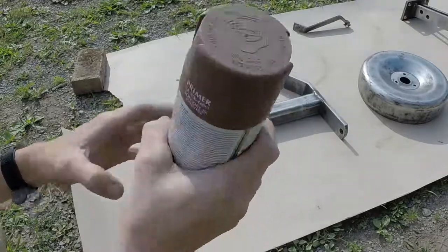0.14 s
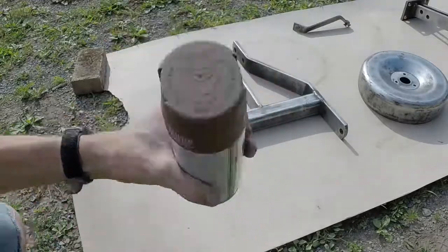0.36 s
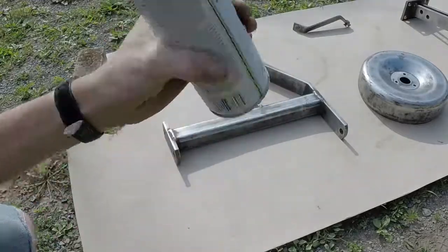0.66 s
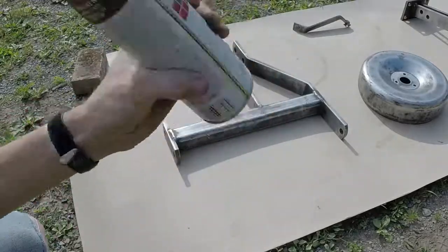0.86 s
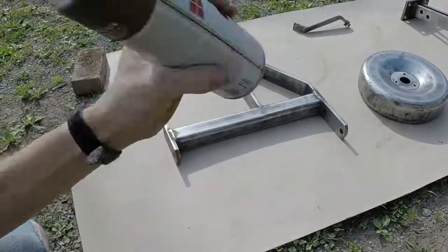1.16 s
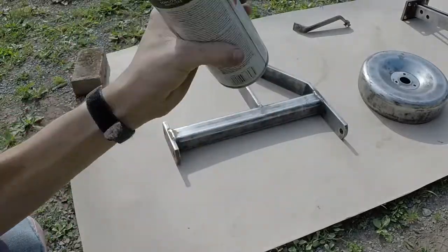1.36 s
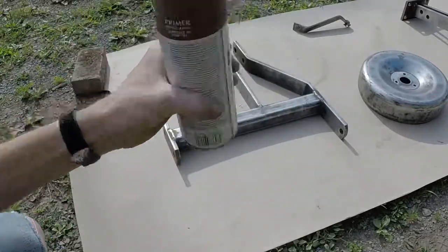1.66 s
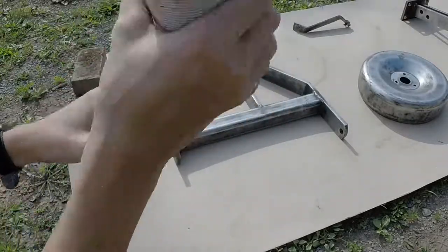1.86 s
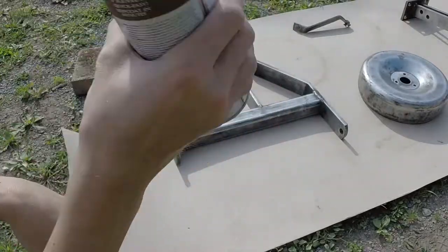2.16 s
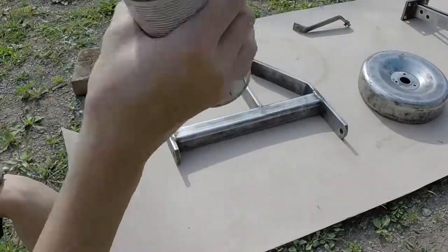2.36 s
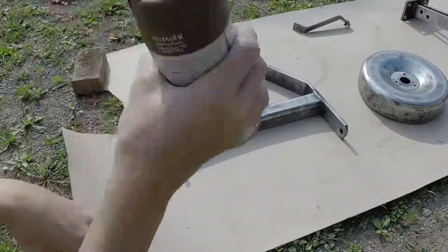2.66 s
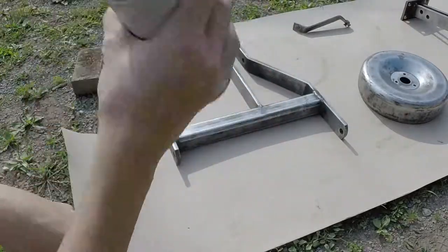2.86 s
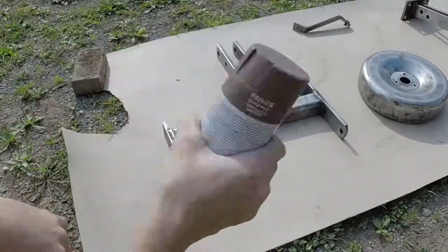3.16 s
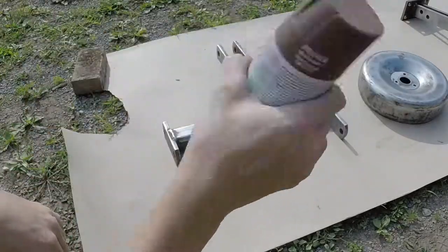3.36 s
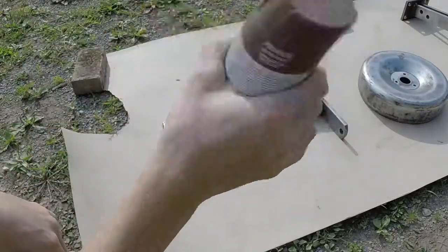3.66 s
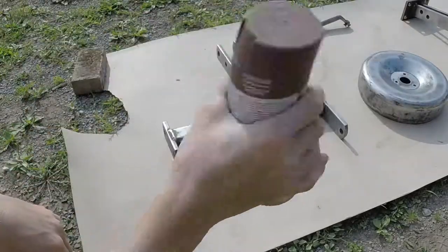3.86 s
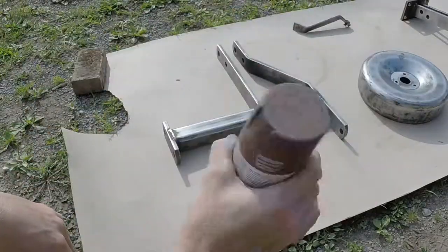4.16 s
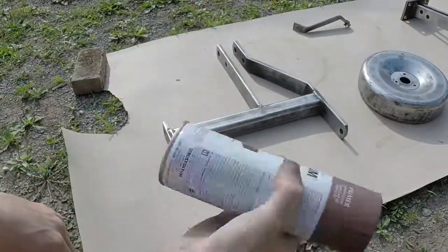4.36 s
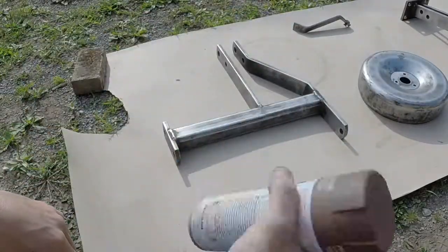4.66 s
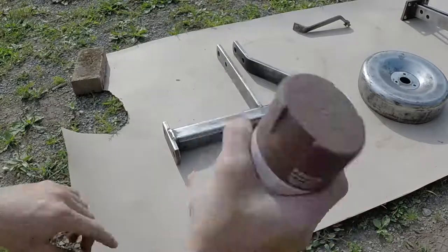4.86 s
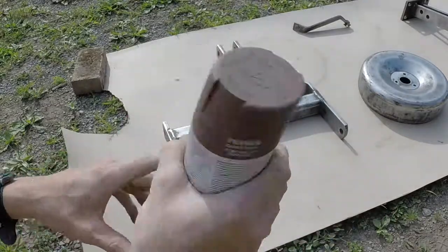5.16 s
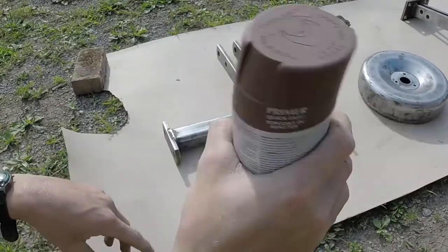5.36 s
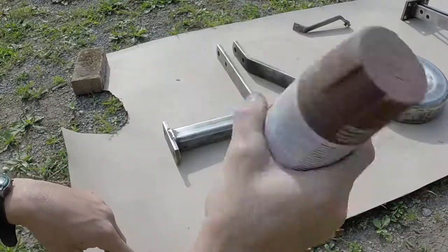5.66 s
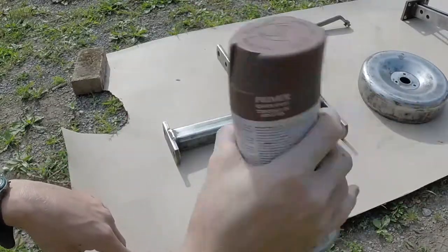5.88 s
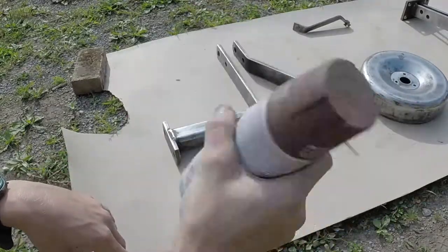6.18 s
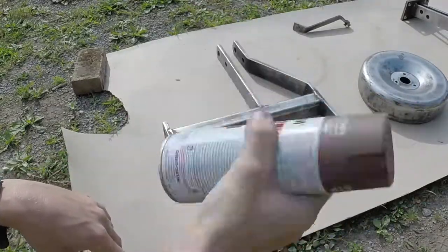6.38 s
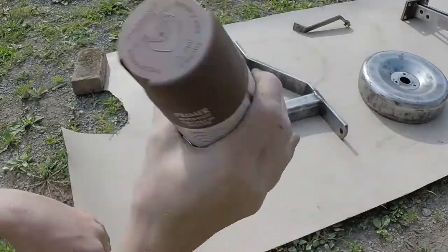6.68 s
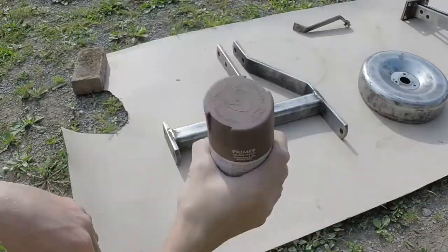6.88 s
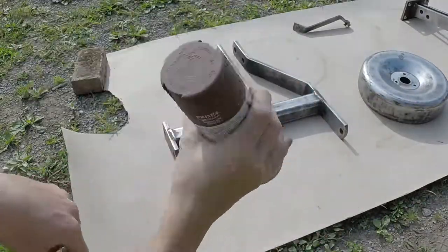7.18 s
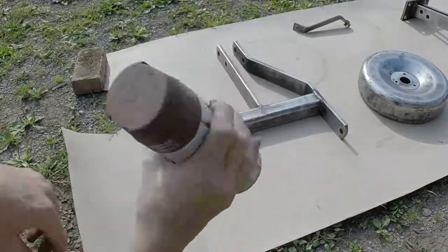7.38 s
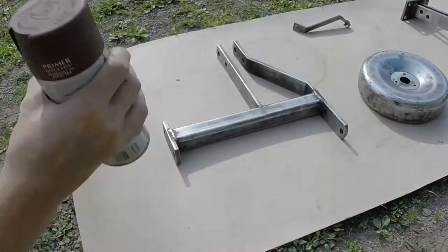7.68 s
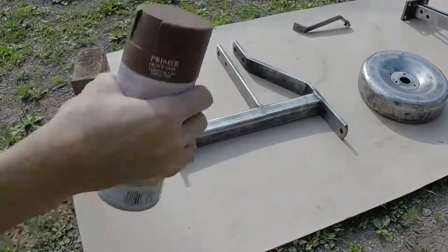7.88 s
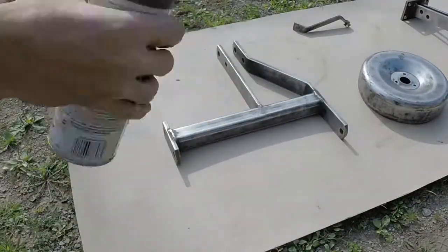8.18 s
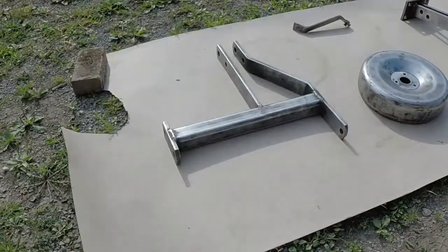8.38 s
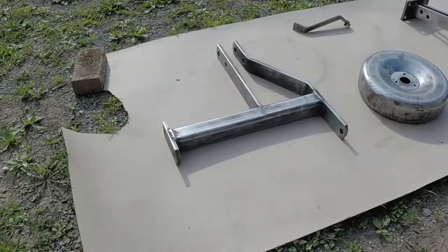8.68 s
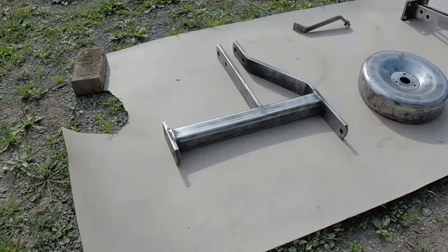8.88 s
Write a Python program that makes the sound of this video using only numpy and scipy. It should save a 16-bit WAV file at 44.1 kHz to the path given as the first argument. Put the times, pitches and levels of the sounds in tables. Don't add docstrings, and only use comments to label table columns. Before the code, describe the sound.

Outdoors, dry and close, a steel spray can is shaken and its mixing ball raps inside. A quick cluster of bright knocks opens the sound, then only faint touches until about 0.7 s, when rapid clacks run to 1.7 s. A distant machine's thin nasal buzz rises around 0.5 to 0.9 s, and its low hum swells several times up to 3.2 s. From 2.1 s stronger strokes ring the can's end, loudest near 2.7 s; from 3.3 to 4.1 s the rattle is dense and clattering. Between 4.2 and 6.6 s it swirls and rocks sideways, softer and duller, thinning around 5.1 s as the buzz briefly returns. Bright, hard up-and-down knocks resume from 6.6 to 8.5 s, the buzz showing again near 7.2 s. A few faint touches fade into soft air and distant traffic, with one small tick at 9 s.

```python
import sys
import numpy as np
from scipy import signal
from scipy.fft import rfft, irfft, next_fast_len
from scipy.io import wavfile
from scipy.ndimage import uniform_filter1d

SR = 44100
rng = np.random.default_rng(int(sys.argv[2]) if len(sys.argv) > 2 else 0)


def store_pcm(level_fs):
    pcm = np.round(np.clip(level_fs, -1, 1) * 32767).astype(np.int16)
    wavfile.write(sys.argv[1], SR, np.atleast_2d(pcm).T)


def nominal_scale(level):
    x = np.asarray(level, float) / 20
    return 10 ** x


N = 398531


def curve(table):
    s, *columns = np.transpose(table)
    return [np.interp(np.arange(N) / SR, s, column) for column in columns]


def level(x, db):
    return x * nominal_scale(db) / np.sqrt(np.mean(x ** 2))


def fade(pieces):
    return np.cos(np.pi * np.clip(pieces, -.5, .5)) ** 2


def held_noise(rows, hold):
    steps = np.repeat(rng.standard_normal((rows, N // hold + 1)), hold, axis=1)
    return uniform_filter1d(steps, hold, axis=1)[:, :N]


# frequency in Hz, density in dB per Hz.
AIR = [(25, -4.5), (60, 0.5), (290, -5.5), (600, -10), (1380, -14.5), (2200, -16.5), (5000, -25),
       (9000, -35.5), (13000, -43), (14300, -48), (15000, -60), (15800, -68)]


def garden():
    size = next_fast_len(N)
    hz = np.maximum(np.arange(size // 2 + 1) * SR / size, 1)
    air_hz, air_db = np.transpose(AIR)
    colour = nominal_scale(np.interp(np.log(hz), np.log(air_hz), air_db))
    air = irfft(rfft(rng.standard_normal(size)) * colour, size)[:N]
    stir_s, stir_db = .06, 1.53
    stir = held_noise(1, int(stir_s * SR))[0]
    return level(air * nominal_scale(stir_db * stir), -53.5)


# time in seconds, centre in Hz, level in dB.
BUZZ = [(0, 1690, -64), (.2, 1640, -59), (.4, 1660, -61.5), (.52, 1620, -56), (.68, 1585, -54),
        (.8, 1557, -53.5), (.86, 1600, -52), (1.0, 1700, -64), (1.7, 1650, -66), (1.95, 1550, -61),
        (2.4, 1660, -65), (5.0, 1670, -67), (5.17, 1630, -58.5), (5.3, 1620, -55), (5.4, 1560, -58),
        (5.6, 1450, -68), (6.9, 1570, -67), (7.2, 1555, -55.5), (7.6, 1600, -78)]
# time in seconds, peak level in dB.
HUM = [
    (.9, -50),
    (1.51, -53.5),
    (2.07, -60),
    (2.46, -50),
    (2.75, -47.5),
    (3.15, -54.5),
    (5.47, -59),
    (7.36, -60),
]


def machine():
    t = np.arange(N) / SR
    mains_hz, resonance_hz, swell_s = 50.65, 75, 0.34
    centre_hz, buzz_db = curve(BUZZ)
    line_hz = mains_hz * np.arange(27, 37)[:, None]
    waver_turns, waver_s = .15, .04
    waver = held_noise(len(line_hz), int(waver_s * SR))
    turns = line_hz * t + rng.random((len(line_hz), 1)) + waver_turns * waver
    resonance = 1 / (1 + ((line_hz - centre_hz) / resonance_hz) ** 2)
    buzz = np.sum(np.sin(2 * np.pi * turns) * resonance, axis=0)
    for power, db in [(2, -10), (3, -19)]:
        band = signal.butter(3, [power * 1300, power * 1950], "bandpass", fs=SR, output="sos")
        envelope = np.abs(signal.hilbert(buzz, next_fast_len(N))[:N])
        overtone = signal.sosfilt(band, (buzz / envelope) ** power)
        buzz = buzz + level(overtone, db)
    flicker_db = 2.5
    buzz = buzz * nominal_scale(flicker_db * waver[0])
    hum = nominal_scale(-68.5) + sum(nominal_scale(db) * fade((t - s) / swell_s) for s, db in HUM)
    return nominal_scale(buzz_db) * buzz + hum * np.sin(4 * np.pi * mains_hz * t)


# time in seconds, cap turned to the microphone in dB, paint slosh in dB.
MOTION = [(0, -3, -4), (.25, 7, -6), (.65, -3, 3), (.9, 6, -2.5), (1.4, 5, 0.5), (1.8, 3, 3), (2.4, 0, 3),
          (3.0, 7, 2.5), (3.3, 4, 4), (4.0, -1, -1), (4.3, 8, 4.5), (4.9, 1, 2.5), (5.2, -1, 1.5),
          (5.9, 2, 4.5), (6.4, 2.5, 3), (7.6, 8, 1.5), (8.4, 1.5, 5.5), (8.8, 1, -15), (9.0, 3, -12)]


def rolling():
    roll_hz, width_hz = 2390, 340
    roll = signal.lfilter(*signal.iirpeak(roll_hz, roll_hz / width_hz, SR), rng.standard_normal(N))
    return level(roll, -62.5) * nominal_scale(curve(MOTION)[1])


# middle in seconds, then levels of wall, bottom, rim and cap modes in dB.
FIRST_UP_DOWN = [(0.015, -35.5, -34, -34.5, -48.5), (0.044, -41.5, -40, -47, -58),
                 (0.082, -37.5, -55, -51, -67), (0.125, -31, -33, -34, -49),
                 (0.734, -37.5, -38.5, -48, -63.0), (0.784, -41.5, -52, -54, -57.5),
                 (0.841, -39.5, -38.5, -43.0, -58), (0.94, -35.0, -35.5, -41, -54.5),
                 (0.987, -47, -52, -45.5, -55.5), (1.033, -30.5, -32.5, -31, -45.5),
                 (1.076, -42, -44, -46, -56), (1.135, -29, -37.5, -35.5, -49.0),
                 (1.173, -43.5, -50, -49, -55), (1.218, -38.5, -38.5, -31.5, -44.5),
                 (1.271, -39.5, -47.0, -56, -57.0), (1.314, -39, -33.5, -42.5, -58.5),
                 (1.356, -45.5, -52, -45.0, -55), (1.398, -30, -27, -39.5, -51),
                 (1.629, -44.5, -49, -62.0, -59.5), (1.679, -41, -42, -43.5, -50)]
SECOND_UP_DOWN = [(2.087, -37, -43.0, -45.0, -51.5), (2.129, -37.5, -43, -48.5, -59),
                  (2.176, -34.5, -29, -43, -59), (2.22, -44.0, -50, -54, -58), (2.478, -45, -42, -54, -67),
                  (2.504, -48, -33.0, -45.5, -51), (2.533, -43.5, -47.5, -52.0, -53),
                  (2.596, -40, -33, -46, -51), (2.636, -37.5, -43, -47.0, -52.5),
                  (2.675, -52, -22, -26, -46.5), (2.74, -44.0, -51, -52.0, -61.0),
                  (2.782, -30.5, -23, -36.5, -48), (2.849, -43.5, -58, -52, -55.5),
                  (2.914, -36.5, -33, -43, -59), (3.027, -33.5, -24.5, -39.5, -52),
                  (3.166, -30, -36.5, -45, -51.5)]
TIPPED_OVER = [(3.277, -42.5, -44.5, -49, -64), (3.305, -43, -39, -47.5, -56),
               (3.352, -38, -34.5, -40.5, -54), (3.375, -41, -36, -36.5, -51.5),
               (3.422, -43, -36.5, -57.0, -63), (3.448, -40, -38, -41, -59.0), (3.475, -41, -32, -46, -55),
               (3.515, -37, -32, -41, -48.5), (3.552, -33.5, -32, -40.5, -54),
               (3.621, -35.5, -32.5, -47, -52.5), (3.641, -43, -28.5, -35, -50),
               (3.663, -28.5, -32.5, -38, -49), (3.711, -40, -34, -37.5, -57),
               (3.734, -38, -34.5, -53, -53.5), (3.767, -34.5, -39, -45.5, -57),
               (3.812, -33.5, -32, -35, -51), (3.862, -41.5, -34, -37.5, -52.5),
               (3.899, -39.0, -33.5, -40.5, -59), (3.961, -41.5, -32.5, -43.5, -60),
               (4.042, -42.5, -38, -43.5, -57.0), (4.112, -40.5, -36.5, -39.5, -52),
               (4.141, -42, -42.5, -54, -64)]
SWIRLED = [(4.214, -37, -46, -49.5, -61), (4.265, -46, -52, -53, -63.0), (4.323, -39.5, -53, -54, -54.5),
           (4.37, -42.5, -48, -53, -54.5), (4.418, -45, -51.5, -68, -62.5), (4.436, -35, -55, -58, -57),
           (4.498, -41, -45.0, -46.5, -54.5), (4.55, -39, -50.0, -51, -60), (4.656, -37.0, -56, -54, -61),
           (4.759, -35.5, -48, -53.5, -56), (4.806, -43, -50.5, -62.5, -63), (4.863, -39.5, -55, -59, -62),
           (5.013, -43.5, -50.0, -53, -62), (5.274, -44, -46, -47.5, -58.5)]
SIDEWAYS = [(5.469, -41, -51, -60, -63), (5.506, -40, -52.5, -72, -65), (5.573, -39.5, -47, -55.5, -67),
            (5.602, -44, -44, -66, -62), (5.65, -39, -47.0, -58, -60), (5.721, -39, -56, -45.5, -51.5),
            (5.852, -36.5, -51, -57, -61.5), (5.868, -43, -53, -48, -56), (5.917, -42, -47.0, -61.0, -66.5),
            (5.988, -43.5, -53.0, -48.0, -56.5), (6.013, -45, -54, -65, -65.0),
            (6.032, -53, -52, -49.0, -55), (6.059, -37.5, -43, -59, -54), (6.097, -36, -48.5, -52.0, -61),
            (6.133, -38.5, -51.5, -50.0, -53), (6.161, -43.5, -48, -56.5, -63),
            (6.185, -42, -52, -50.0, -56), (6.212, -44, -50, -52, -57), (6.238, -36.5, -52.5, -50.0, -59.0),
            (6.294, -39.5, -44, -54, -60), (6.355, -41.5, -58, -52, -61), (6.452, -42, -53, -54.0, -60.5),
            (6.512, -44.5, -58, -50.5, -64)]
LAST_UP_DOWN = [(6.638, -33.5, -33.5, -32.5, -44), (6.682, -40.5, -51, -50, -57),
                (6.74, -39, -28, -33.5, -40.5), (6.786, -44.5, -57, -47, -55.0),
                (6.857, -46.5, -47, -54, -50.0), (6.896, -46, -60.0, -46, -61),
                (6.945, -42.5, -39.5, -41.0, -51), (7.034, -39, -29.0, -40.5, -44),
                (7.152, -39, -37, -42.0, -45.5), (7.198, -48, -55, -47.5, -57),
                (7.246, -38.5, -35.5, -44, -56.0), (7.35, -36, -31.5, -36.5, -43.5),
                (7.397, -44, -52, -52, -55), (7.446, -35.5, -31, -40.5, -49), (7.511, -43, -52, -51, -57),
                (7.551, -34.5, -26, -29, -42.5), (7.781, -40.5, -36.0, -41.5, -53.5),
                (7.832, -41, -52, -57, -57), (7.896, -42, -26.5, -36.5, -49),
                (8.012, -35.5, -34, -43.0, -50), (8.104, -37.5, -26, -39, -49),
                (8.213, -31, -28.5, -33.5, -46), (8.258, -42.5, -47, -50.5, -61),
                (8.349, -61, -39, -52.5, -65.0), (8.391, -41.5, -44, -59.5, -61),
                (8.41, -50, -44, -51, -58), (8.434, -37.5, -35.5, -39.5, -54),
                (8.47, -53, -45.5, -54, -58.5), (8.532, -42.5, -47.5, -47, -65),
                (9.027, -45, -45.5, -49.5, -51)]
# middle in seconds, then levels of wall, bottom and rim modes in dB.
REBOUNDS = [(0.202, -50.5, -58, -72), (0.307, -50, -55, -61), (0.454, -46, -54, -53.5),
            (0.61, -53, -68, -74), (0.663, -50, -55, -55.5), (0.703, -54, -59.0, -62.5),
            (0.885, -44.5, -52, -51), (0.922, -45, -47, -57), (0.962, -43.5, -59.0, -63),
            (1.379, -44.5, -54, -71), (1.458, -52, -56.0, -68), (1.517, -47, -51, -57.5),
            (1.591, -50, -50.5, -50.5), (1.648, -42.5, -47, -62), (1.748, -53, -57, -61),
            (1.841, -54, -60, -74), (1.88, -55, -55.5, -68), (1.95, -52.5, -57, -78),
            (2.043, -50.5, -52.0, -63.5), (2.105, -46, -47, -58), (2.266, -45.5, -56.5, -59),
            (2.332, -62, -63, -59), (2.386, -53, -63, -61), (2.442, -53.0, -51, -61),
            (2.564, -53.0, -52, -62), (2.69, -43, -39, -46), (2.77, -57, -55, -60),
            (2.722, -51, -61.0, -70), (2.826, -48, -56, -71), (2.893, -53, -54.0, -76),
                   (2.95, -52, -50, -61), (2.977, -49, -57, -53), (3.048, -43, -49, -53.0),
                   (3.092, -47, -59, -52), (3.114, -55, -62.5, -62), (3.203, -46, -57.5, -60),
                   (3.327, -42.5, -40, -56), (3.499, -48, -42, -50), (3.536, -49, -38, -46),
                   (3.567, -39.5, -41, -52), (3.749, -56, -42, -51), (3.827, -52, -46, -62),
                   (3.879, -66, -44, -52), (3.918, -40, -43, -47.0), (3.939, -50, -55, -56),
                   (4.064, -46, -47, -46.0), (4.094, -54, -55, -61), (4.194, -46, -57, -60.0),
                   (4.234, -44.5, -58, -58), (4.288, -51, -52.5, -60), (4.306, -47, -56, -76),
                   (4.346, -44, -51, -58), (4.479, -50, -53.0, -54), (4.529, -51, -46, -61),
                   (4.567, -51, -62, -55), (4.583, -47, -54.0, -63), (4.603, -45.5, -53.0, -50.5),
                   (4.632, -46, -47, -62.0), (4.68, -51, -49.5, -58.0), (4.703, -53, -62.0, -71),
                   (4.741, -50, -50, -53.5), (4.782, -45, -55, -60), (4.84, -48, -63, -66.0),
                   (4.906, -44.5, -49, -53.5), (4.975, -50.5, -71, -80), (5.044, -49, -57, -63),
                   (5.084, -54, -63, -65), (5.182, -53, -67, -66.0), (5.204, -54, -57, -67),
                   (5.292, -45.5, -52, -64), (5.359, -50, -56, -56),
            (5.427, -47, -58, -63), (5.542, -51, -57, -60), (5.74, -42, -48, -54),
                 (5.796, -48, -48.5, -59), (5.822, -45.5, -50, -52), (5.897, -47, -58.0, -58),
                 (5.957, -46, -53.0, -74), (6.077, -45, -59, -46.5), (6.333, -54, -56.0, -58),
                 (6.374, -50, -58.0, -58), (6.421, -45.5, -55, -59), (6.473, -46, -63, -62.5),
                 (6.493, -45, -51.5, -65), (6.536, -50, -45, -61), (6.554, -45, -62, -55),
                 (6.573, -46, -53.0, -53.0), (6.591, -47, -57.0, -57), (6.653, -41, -46, -47),
                 (6.758, -45, -43, -51), (6.962, -49, -53, -54.5), (6.992, -47.5, -55, -50.5),
                 (7.05, -46, -52, -59), (7.098, -49, -57.5, -56), (7.171, -43.5, -54.5, -68),
                 (7.3, -51, -53, -55.5), (7.365, -40, -44, -50), (7.488, -48, -61, -69),
                 (7.571, -43, -45, -63), (7.614, -47.5, -56, -58), (7.705, -51, -47, -59),
                 (7.74, -48.5, -62, -53), (7.885, -45, -37, -43), (7.949, -45.5, -53, -53),
                 (8.05, -48, -49, -59), (8.094, -56, -45, -37), (8.157, -44.5, -53, -54),
                 (8.203, -65, -41, -46), (8.319, -47, -54, -56), (8.364, -43.5, -52, -74),
                 (8.632, -54, -49.5, -71.5), (8.716, -55, -69, -80), (8.799, -59, -61, -78),
            (1.055, -42.5, -64, -73),
    (1.425, -50, -54, -58),
    (1.711, -51, -60, -66),
    (2.804, -46, -45, -69),
    (5.235, -58, -60, -68),
    (7.92, -60, -62, -71),
    (8.127, -60, -64, -79),
]
# middle in seconds, frequency in Hz, level in dB.
CLEAR = [(.842, 1765, -44), (.942, 1787, -42.5), (.985, 1740, -46), (1.078, 1730, -46),
         (1.173, 1730, -45.5), (1.269, 1770, -44), (1.319, 1787, -45), (1.398, 2367, -28.5),
         (2.675, 3606, -24), (2.676, 4931, -36), (2.679, 2350, -37), (3.026, 1830, -49), (3.421, 1540, -46),
         (3.476, 1765, -47), (3.516, 2720, -33), (3.621, 1810, -45.5), (4.106, 1770, -46),
         (4.368, 1650, -45), (4.656, 1880, -46.5), (5.849, 1726, -51), (7.397, 1790, -47),
         (7.512, 1530, -49), (7.549, 3410, -37), (7.889, 4650, -37), (8.156, 1720, -47), (9.027, 820, -52)]


def knocks():
    hard = np.vstack([FIRST_UP_DOWN, SECOND_UP_DOWN, TIPPED_OVER, SWIRLED, SIDEWAYS, LAST_UP_DOWN])
    rest_db = -36
    clear = [(s, *[db + rest_db] * 3) for s, _, db in CLEAR]
    light = np.vstack([REBOUNDS, clear])
    s, wall, bottom, rim = np.vstack([hard[:, :4], light]).T
    mood = rng.standard_normal((2, len(s)))
    facing_db, slosh_db = (column[(s * SR).astype(int)] for column in curve(MOTION))
    paint = 0.38 * wall + 0.071 * rim - 35 + slosh_db + 3.74 * mood[0]
    cap = 0.36 * wall + 0.52 * rim - 20 + facing_db + 2.4 * mood[1]
    cap[:len(hard)] = hard[:, 4]
    return s, wall, bottom, rim, paint, cap


SIZE = 3072
PIECES = (np.arange(SIZE) - SIZE // 3) / SR / 0.037
BIN_HZ = np.arange(SIZE // 2 + 1) * SR / SIZE


def skidding(count):
    tick_db = 2.5 * rng.exponential(size=(count, SIZE))
    skid = rng.standard_normal((count, SIZE)) * nominal_scale(tick_db)
    drive = rfft(skid * (fade(PIECES / 1.5) + .2))
    return drive / np.sqrt(uniform_filter1d(np.abs(drive) ** 2, size=9, axis=1))


def ring(modes, width_hz, drive, piece, peak_db):
    scatter_db, phase_spread, skirt, even, top_hz = 2, .7, .19, .4, 15780
    chance = rng.standard_normal((len(drive), len(modes), 3))
    response = 0
    for k, (f, db) in enumerate(modes):
        strength, detune, turn = chance[:, k].T[:, :, None]
        r = BIN_HZ / (f + 0.19 * width_hz * detune)
        pole = r / (r + 1j * (r * r - 1) * f / width_hz)
        shape = pole * (pole + skirt / (1 + r ** 4))
        response = response + nominal_scale(db + scatter_db * strength) * np.exp(1j * phase_spread * turn) * shape
    sound = irfft(drive * response * np.clip((top_hz - BIN_HZ) / 250, 0, 1), SIZE)
    power = uniform_filter1d(sound ** 2, size=400, axis=1, mode="wrap")
    sound = piece * sound / power ** even
    gain = nominal_scale(peak_db) * np.sqrt(np.sum(piece ** 2) / np.sum(sound ** 2, axis=1))
    return sound * gain[:, None]


# frequency in Hz, level in dB.
PAINT = [(980, -8.5), (1380, -4.5), (1530, 2), (1660, 5.5), (1775, 5), (1880, 4.5)]
WALL = [(2135, -9.5), (2290, -5), (2400, -3), (2480, 0), (2720, -4)]
BOTTOM = [(3020, -5.5), (3160, 3), (3300, -0.5), (3420, 1), (3530, -4.5), (3770, -6)]
RIM = [(4270, -4), (4530, 2.5), (4665, 2.5), (4910, -5.5), (5120, -9), (5640, -4.5)]
SHOULDER = [(6200, 0), (6630, 0.5), (7050, 0.5), (7520, -2.5)]
CAP = [(8700, 0), (10300, -8), (11700, 0), (12700, -15), (14200, -34)]
# time in seconds, level against the shoulder in dB.
GRIP = [(0, -2), (.3, -8), (1.6, -6.5), (2.8, -3.5), (3.1, -8.5), (4.0, -5), (4.4, -14), (5.2, -9),
        (5.8, -12.5), (6.6, -8.5), (7.2, -10), (8.2, -4), (9.04, -8)]
# frequency in Hz, width in Hz, level in dB.
LINGER = [(2398, 37, -5.5), (3145, 20, -21), (3360, 29, -11), (4700, 24, -20), (1768, 36, -4)]


def can():
    s, wall_db, bottom_db, rim_db, paint_db, cap_db = knocks()
    drive = skidding(len(s))
    piece = fade(PIECES) ** 0.9 + nominal_scale(-26) * fade(PIECES - .65) + nominal_scale(-36.5) * fade(PIECES + .45)
    thicket = nominal_scale(9 * uniform_filter1d(rng.standard_normal(drive.shape), size=3, axis=1))
    sideways = (s > 4.17) & (s < 6.61)
    coat = nominal_scale(-12 * np.outer(sideways, np.clip(BIN_HZ / 1000, 2, 3)))
    grip_db = curve(GRIP)[0][(s * SR).astype(int)]

    sound = ring(PAINT, 173, drive, piece, paint_db)
    sound += ring(WALL, 96, drive * coat, piece, wall_db)
    sound += ring(BOTTOM, 139, drive, piece, bottom_db)
    sound += ring(RIM, 178, drive, piece, rim_db)
    sound += ring(SHOULDER, 530, drive * thicket, piece, cap_db)
    sound += ring(CAP, 1770, drive * thicket, piece, cap_db + grip_db)
    _, clear_hz, clear_db = np.transpose(CLEAR)
    last = len(CLEAR)
    sound[-last:] += ring([(clear_hz[:, None], 0)], 125, drive[-last:], piece, clear_db)

    out = np.zeros(N + 2 * SIZE)
    starts = (s * SR).astype(int) + SIZE - SIZE // 3
    for start, knock in zip(starts, sound):
        out[start:start + SIZE] += knock
    out = out[SIZE:SIZE + N] + rolling()
    singing = sum(nominal_scale(db) * signal.lfilter(*signal.iirpeak(f, f / width, SR), out) for f, width, db in LINGER)
    return out + singing


def scene():
    return (can() + machine() + garden())[None]


def top_cut(x):
    return signal.sosfilt(signal.butter(12, 15790, fs=SR, output="sos"), x)


def record(dry):
    return top_cut(dry)


dry = scene()
out = record(dry)
store_pcm(out)
```